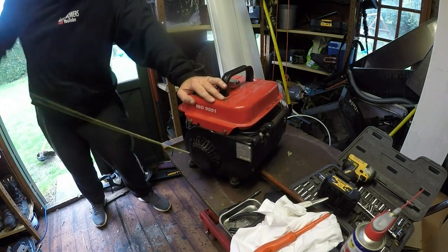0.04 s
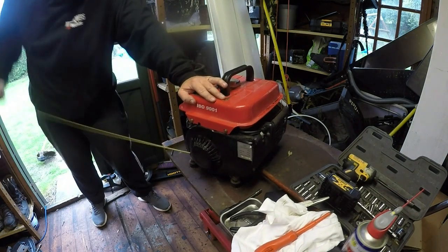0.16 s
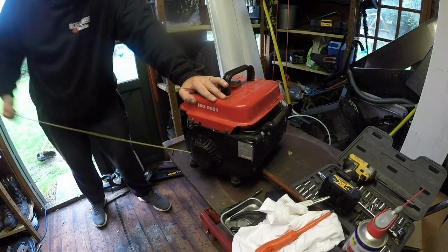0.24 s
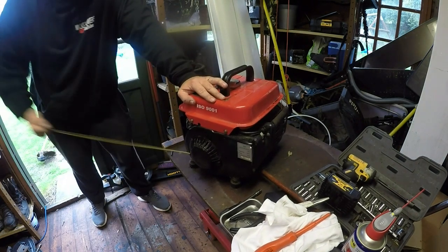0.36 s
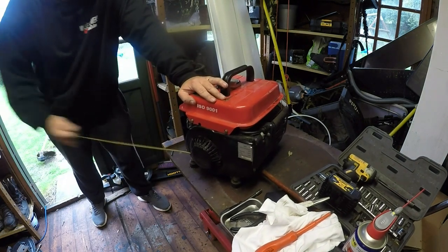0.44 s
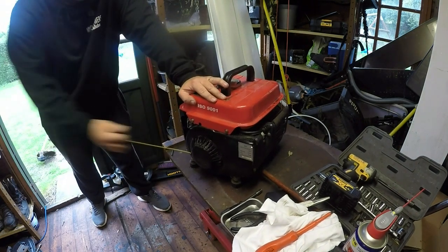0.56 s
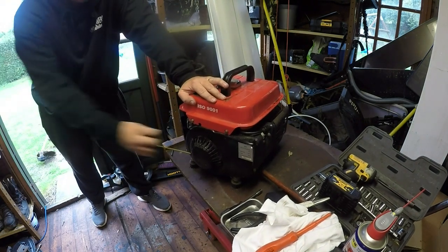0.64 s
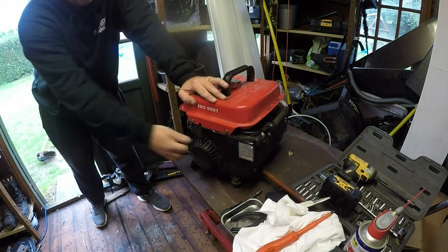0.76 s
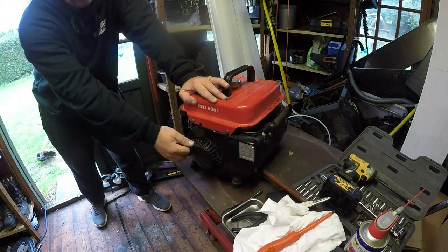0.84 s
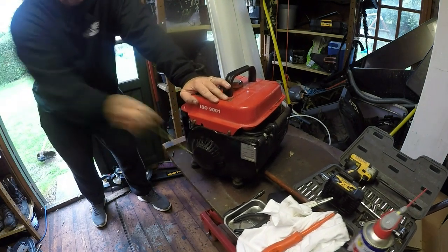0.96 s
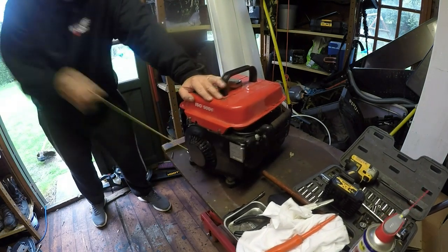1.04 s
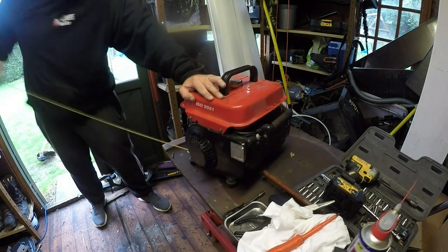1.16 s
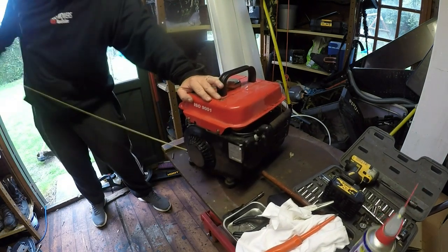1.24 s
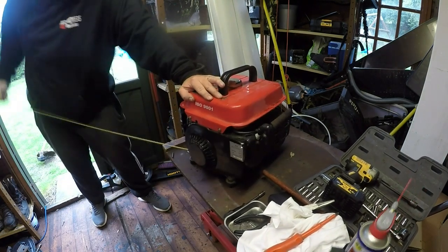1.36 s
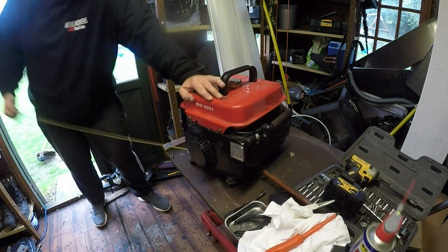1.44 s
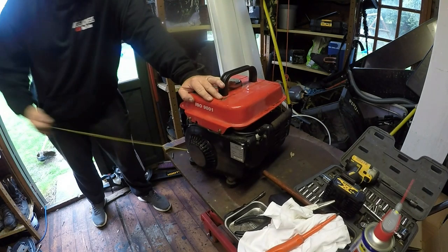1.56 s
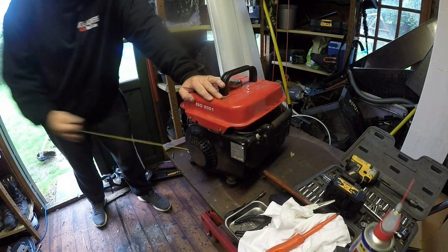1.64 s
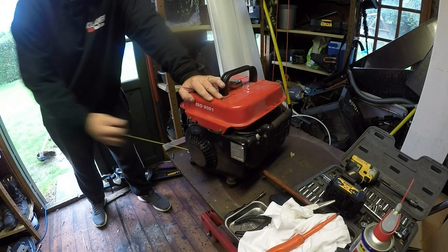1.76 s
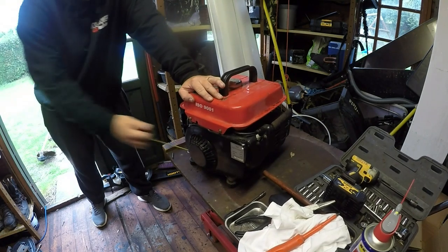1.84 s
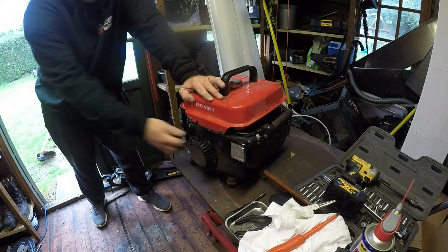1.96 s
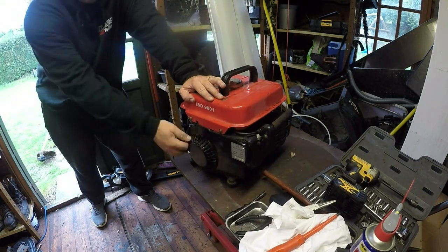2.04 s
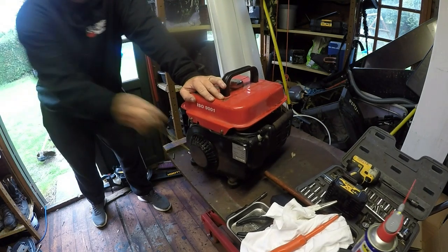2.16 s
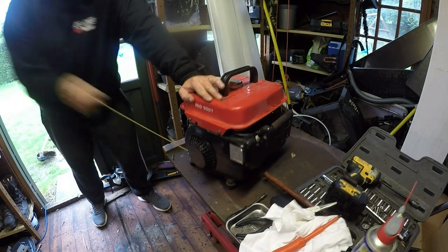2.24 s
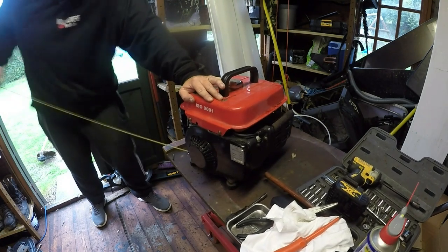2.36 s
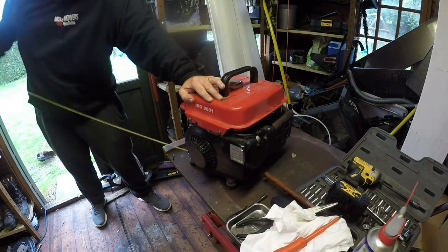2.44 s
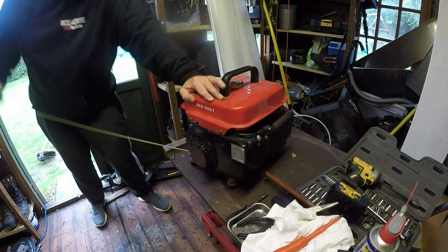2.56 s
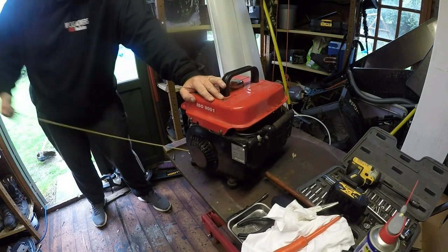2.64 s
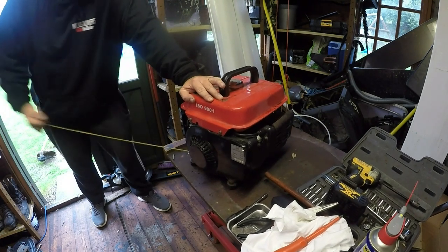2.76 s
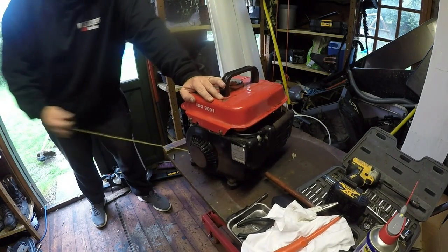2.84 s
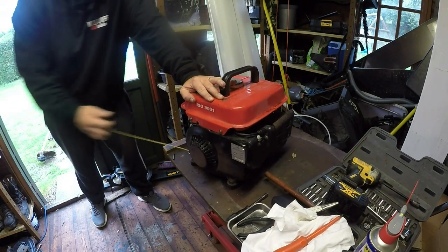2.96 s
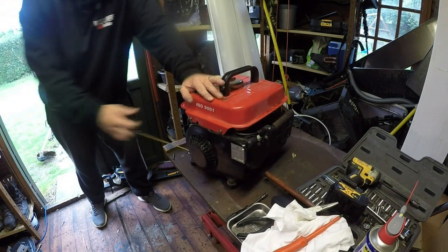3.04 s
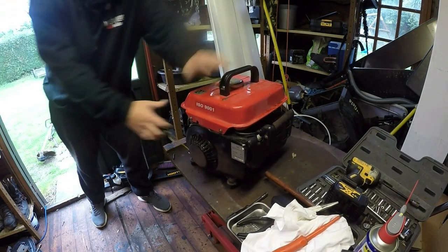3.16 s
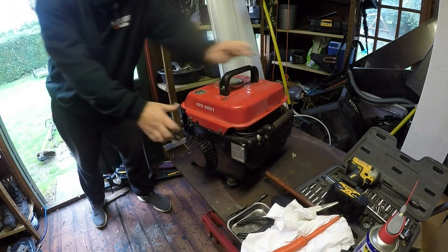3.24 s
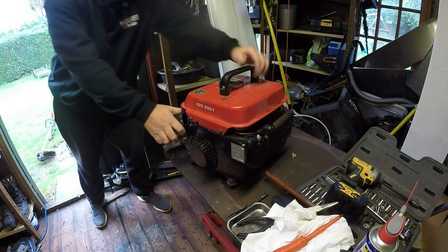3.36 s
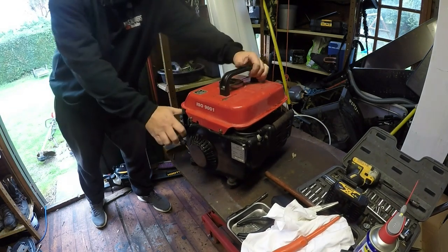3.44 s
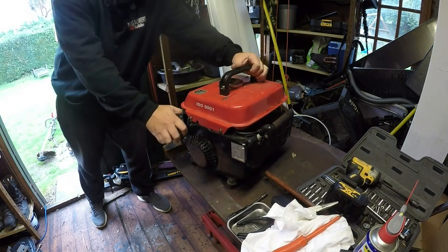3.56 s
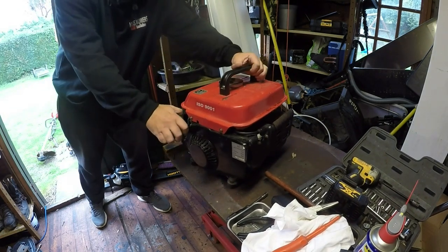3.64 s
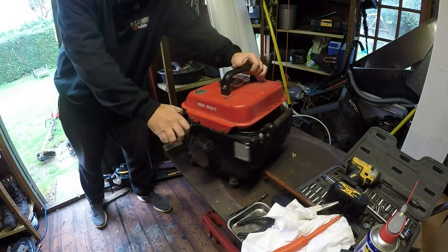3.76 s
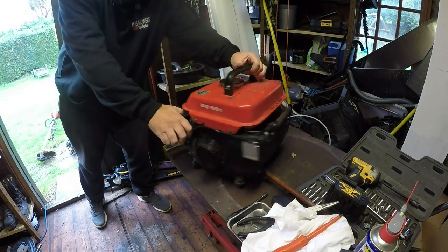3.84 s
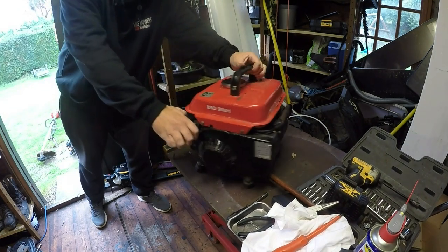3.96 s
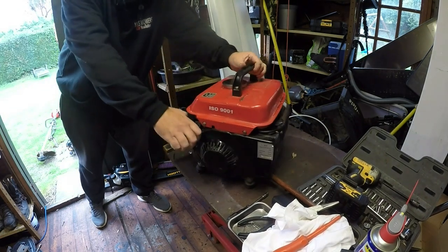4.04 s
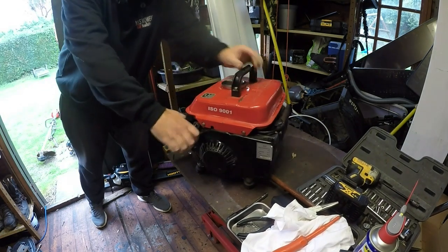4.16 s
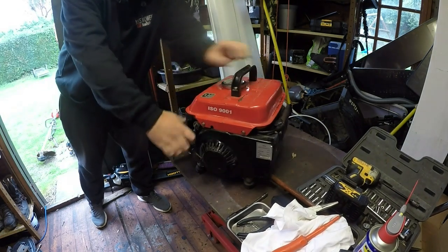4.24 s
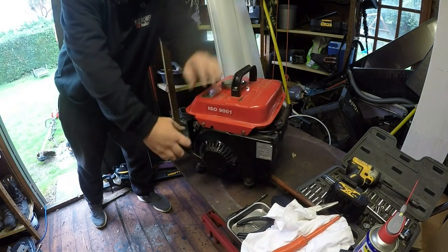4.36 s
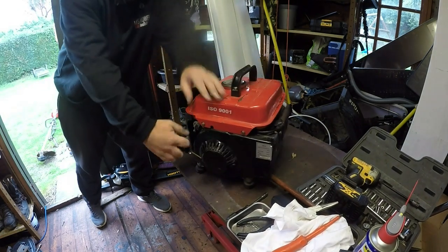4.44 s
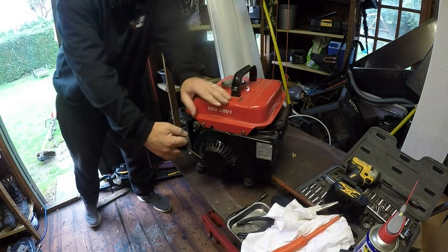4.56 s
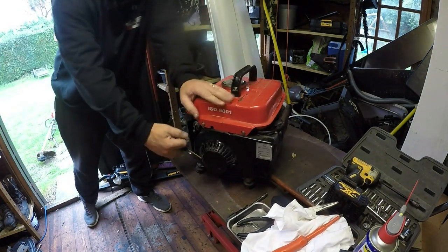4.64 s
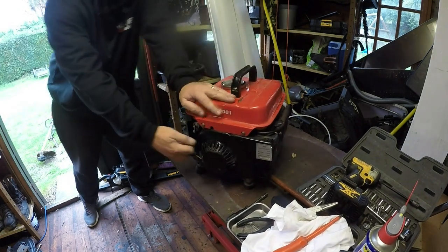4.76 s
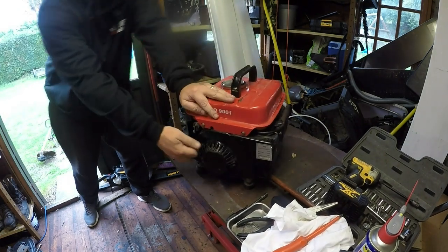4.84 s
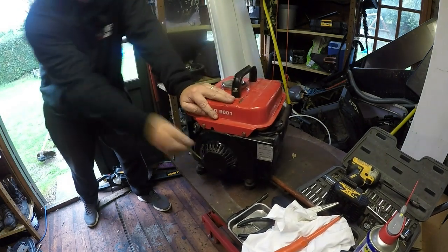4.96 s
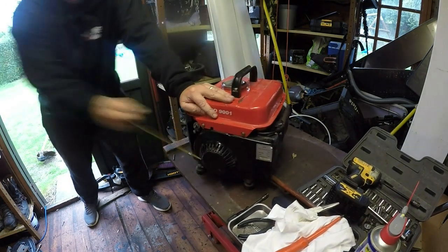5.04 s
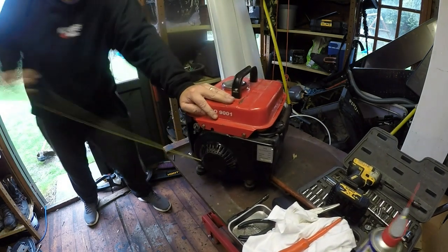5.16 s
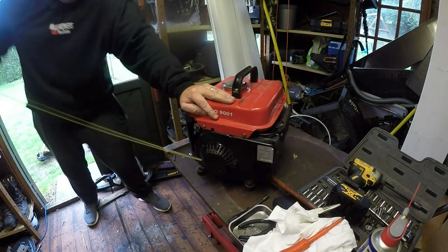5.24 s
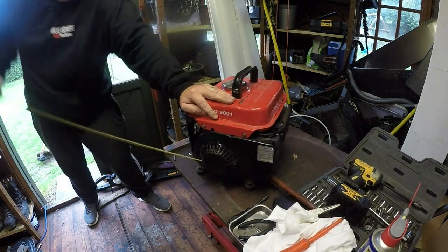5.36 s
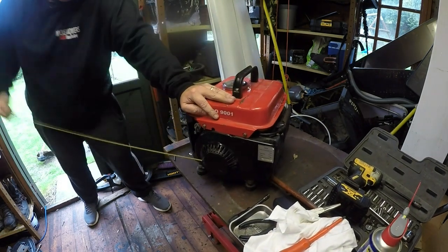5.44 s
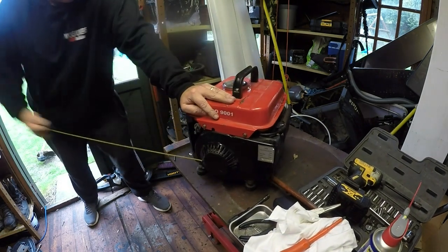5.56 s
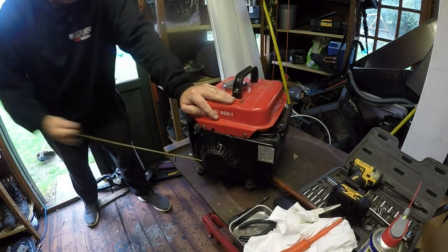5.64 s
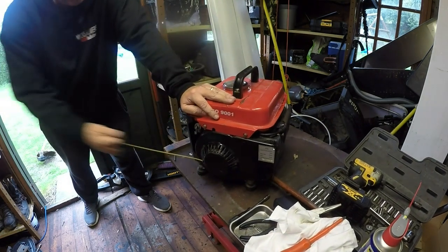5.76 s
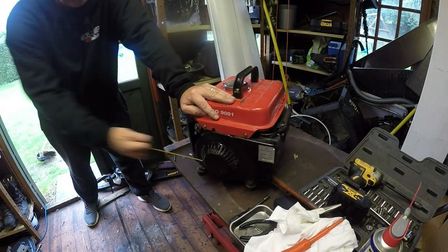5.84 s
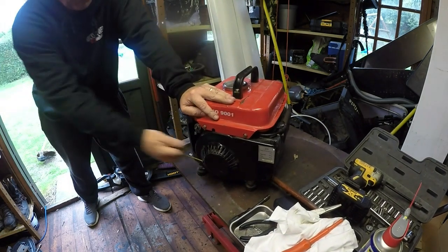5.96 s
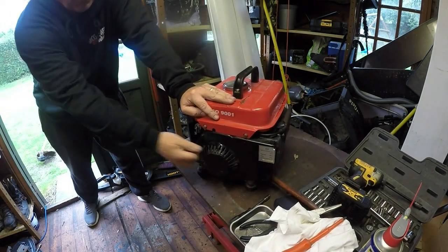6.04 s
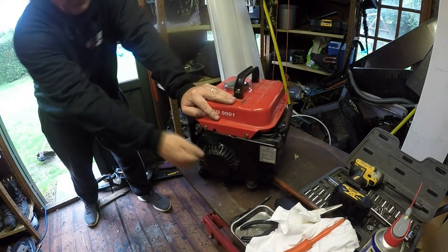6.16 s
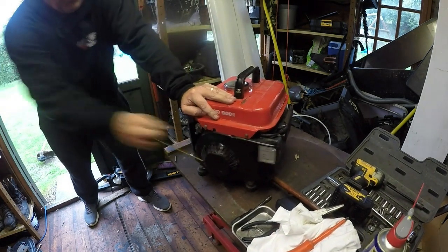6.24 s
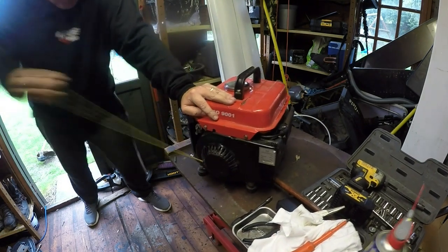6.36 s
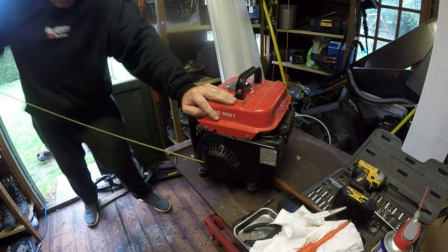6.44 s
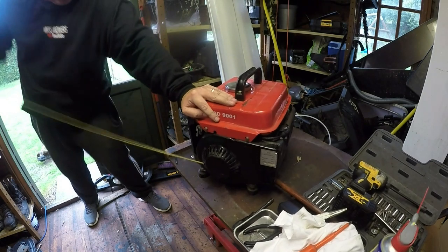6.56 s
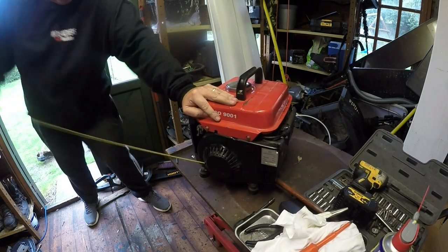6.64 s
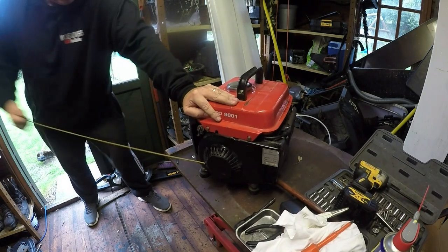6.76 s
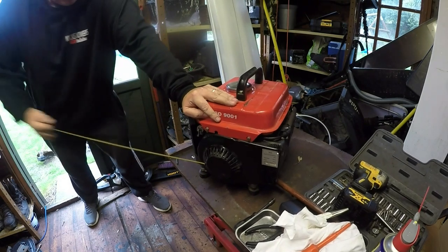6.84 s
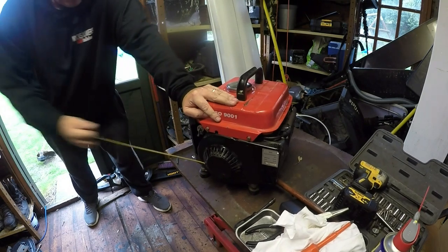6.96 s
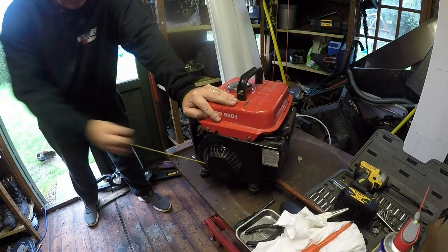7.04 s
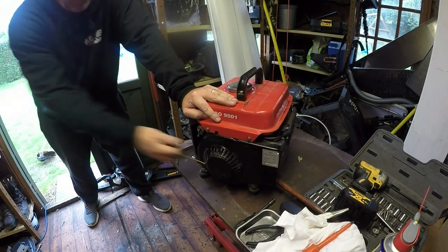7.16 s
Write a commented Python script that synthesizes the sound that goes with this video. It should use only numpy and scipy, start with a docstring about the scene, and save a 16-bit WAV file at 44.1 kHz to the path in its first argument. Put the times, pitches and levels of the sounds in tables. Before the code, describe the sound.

A small petrol engine is yanked over by its recoil rope five times, whining, whirring and clacking, then puffing slower to a stop without firing.

```python
"""A small two-stroke generator on a wooden bench is pulled over by its rope and coasts down without firing.
Each crank turn puffs through the muffler box; the rope whines through its guide; rubbing parts whirr and scrape.
Dogs bang in, loose metal clacks and the handle knocks home: noise bursts through decaying modes.
Once, between pulls, the machine is dragged round on the bench. Steady shed air and a short echo surround it."""
import sys
import numpy as np
from scipy import signal
from scipy.fft import rfft, irfft
from scipy.io import wavfile
from scipy.ndimage import uniform_filter1d

SR = 44100
rng = np.random.default_rng(int(sys.argv[2]) if len(sys.argv) > 2 else 0)


def unload_wav(signal):
    """Save mono or channel-first audio to the path in sys.argv[1] as 16-bit WAV at rate SR, clipped to [-1, 1]."""
    wavfile.write(
        sys.argv[1],
        SR,
        np.round(np.clip(np.atleast_2d(signal).T, -1, 1) * 32767).astype(np.int16),
    )


N = 317520  # samples

# Levels are relative unless a source's own mix gain is unity.
# Handle landing on the cover or dogs biting: (time [s], level [dB], cover thud [dB re level],
# steel ring [dB re level], contact decay [s], frame thump [dB re level])
KNOCKS = [(0.7693, -17, 6, -44, 0.015, -35), (0.9379, -15, -23, -25, 0.018, -8),
          (0.9475, -3.5, -7.5, -19.5, 0.0096, -18), (0.9566, -22.5, 15, -6, 0.0068, 13),
          (1.9908, -18.5, 6.5, -48, 0.02, -33), (2.1402, -10.5, 3, -19, 0.0098, 1.5),
          (2.1483, -20, -5, -17, 0.009, 4), (4.9879, -2.5, -13.5, -18, 0.0044, -5),
          (4.9936, -10, -5, -7, 0.003, -17), (5.0023, -8.5, -7, -16.5, 0.009, -16),
          (6.0606, -13, 1, -28, 0.014, -34), (6.201, 1.5, -1.5, -21, 0.0033, -31),
          (6.2058, -16, -1, -6.5, 0.0098, 7)]
# Bright clacks of loose metal: (time [s], level [dB], steel ring [dB re level], part pitch [Hz])
CLACKS = [(.0376, -11, -42, 3440), (.0524, -12, -19, 2400), (.2129, -8, -20.5, 3480),
          (.2482, -13, -15, 2085), (.3505, -19.5, -9, 2860), (.4409, -15, -17, 2250),
          (.9158, -20, -23, 2040), (1.1501, -11, -41, 1930), (1.2121, -6, -37, 2890),
          (1.2252, -5.5, -16, 2655), (1.4057, -6, -20, 3160), (1.4436, -11, -20, 2490),
          (1.5196, -19, -12, 2057), (1.5828, -8.5, -22, 2530), (2.0976, -46, -29, 2590),
          (2.1238, -22.5, -17, 2320), (2.4144, -6, -34, 2550), (2.4278, -11.5, -12, 2614),
          (2.615, -11, -14, 3150), (2.6852, -4.5, -18, 2850), (2.7504, -10, -18.5, 3450),
          (3.4005, -29, -29, 2790), (3.5796, -44.5, -31, 3450), (4.1157, -31.5, -38, 3000),
          (4.4118, -41.5, -38, 2600), (4.9666, -20.5, -20, 2680), (5.25, -3, -21, 2870),
          (5.2602, -4, -32, 3600), (5.4528, -8, -16.5, 3490), (5.5, -2, -22.5, 2330),
          (5.5745, -7.5, -21, 3734), (6.039, -30.5, -35, 1980), (6.1789, -18.5, -23, 3420),
          (6.2805, -14, -20, 2592), (6.4703, -5, -39, 2750), (6.4826, -6, -13, 2880),
          (6.6843, -17.5, -20, 3310), (6.7315, -10, -20, 2250), (6.7647, -18.5, -20, 3584),
          (6.8034, -14, -14.5, 2040), (6.8274, -17.5, -13, 3675), (6.9023, -9, -17, 3650),
          (7.0758, -17.5, -21, 2810)]
# Dull chuffs as the stalled crank rocks: (time [s], level [dB])
ROCKING_CHUFFS = [(0.863, -30.5), (3.174, -42), (3.257, -30), (3.314, -32.5), (3.459, -28.5), (3.568, -39),
                  (4.077, -47), (4.636, -48), (6.149, -25)]
# Rope whine per pull: (start [s], step up [s], thin out [s], end [s], first strand rate [Hz],
# rate after step [Hz], late rate [Hz], level [dB], overtones [dB])
WHINES = [(1.028, 1.049, 1.154, 1.206, 1430, 1660, 1720, -16.5, 0),
          (2.236, 2.247, 2.38, 2.41, 1438, 1650, 1740, -16, -1),
          (5.08, 5.086, 5.215, 5.25, 1499, 1710, 1740, -16.5, -3.5),
          (6.283, 6.306, 6.455, 6.478, 1410, 1710, 1930, -16.5, -0.5)]
# Rewinding starter clips the cup: (time [s], level [dB])
CUP_TAPS = [(.213, -40), (1.406, -32), (2.685, -35), (5.453, -25), (6.902, -20)]
# Machine turned on the bench: (time [s], feet judder [dB], sleeve rustle [dB])
DRAG = [(3.7, -78, -78), (3.804, -45.5, -57.5), (3.98, -47, -59), (4.056, -62, -56.5), (4.098, -55, -52.5),
        (4.154, -76, -53.5), (4.32, -91, -85)]
# Pulls: (dogs bite [s], dogs let go [s], last puff [s], crank speed at last puff [turns/s],
# slowing [turns/s per s], effort [dB], cup ring [dB], mid rewind [s], rewind rattle [dB])
PULLS = [ (-.22, .051, .671, 4.8, 30.8, 2, -33, 0.34, -33),
         (.946, 1.226, 1.903, 5.0, 27.8, 2.5, -18, 1.506, -32),
         (2.139, 2.428, 3.114, 5.45, 25.1, 2, -28, 2.72, -32),
         (4.987, 5.26, 6.014, 3.4, 34.3, 2, -27, 5.5, -34.5),
         (6.199, 6.485, 7.208, 8.47, 25.3, 1.5, -42, 6.37, -30.5)]
# Shape of every pull: (share of bite-to-release time, whirr [dB], scrape [dB], bench rumble [dB])
HAUL = [(0.0, -50, -45, -47), (.15, -31.5, -29, -25.5), (.4, -29, -24, -29), (.6, -33.5, -24, -30),
        (.8, -38.5, -21.5, -28.5), (1.0, -42.5, -26.5, -33), (1.15, -50, -44.5, -35)]
# Coasting at full speed: (whirr [dB], scrape [dB], bench [dB], feet [dB])
COAST_DB = [-36, -37, -30, -31]
# Level change with speed: (whirr, scrape, bench, feet) [dB per dB of speed]
COAST_SLOPE = [0.35, 0.67, 0.99, 0.57]
# Only hands on the machine: (whirr [dB], scrape [dB], bench [dB], feet [dB])
REST_DB = [-68, -65, -66, -45]

# Modes of starter cover: (frequency [Hz], level [dB], t60 [s])
COVER_MODES = [(703.7, -5, 0.078), (739.3, -6.5, 0.092), (853, -1.5, 0.029), (1002, -9, 0.032),
               (1190, -3, 0.041), (1415, -3.5, 0.026)]
# Modes of loose metal parts: (frequency [Hz], level [dB], t60 [s])
METAL_MODES = [(1540, -4, .06), (1739, -10, .1), (2083, -12, .1), (2250, -12, .12), (2449, -10, .12),
               (2584, -8, .2), (2767, -10, .1), (3278, -6, .07), (3634, -6, .07), (4100, -9, .08),
               (4850, -12, .08), (6050, -14, .07)]
# Modes of steel on steel: (frequency [Hz], level [dB], t60 [s])
STEEL_MODES = [(7693, -8, .08), (9080, -4, .1), (9250, -2, .18), (9420, -3, .1), (9650, -4, .07),
               (9900, -6, .07), (10090, -6, .08), (13300, -9, .07), (13620, -9, .13), (13900, -10, .08),
               (14300, -11, .07)]
# Modes of starter cup: (frequency [Hz], level [dB], t60 [s])
CUP_MODES = [(2906, -4, .5), (2935, -6, .3), (5430, -8, .4), (9170, -7, .4), (9290, -8, .25),
             (13650, -17, .2)]
# Modes of tube frame: (frequency [Hz], level [dB], t60 [s])
FRAME_MODES = [(333, 0.5, 0.17), (436, 2.5, 0.11), (488, 2.5, 0.071), (626, -12.5, 0.016)]
# Modes of wooden bench: (frequency [Hz], level [dB], t60 [s])
BENCH_MODES = [(153.4, -2, 0.13), (219.3, -8, 0.099), (321, 0, 0.062), (367, -13, 0.12)]
# Modes of machine on its feet: (frequency [Hz], level [dB], t60 [s])
FEET_MODES = [(27.5, -2, 0.57), (42.2, 1, 0.27), (71, -9, 0.12)]
# Modes of muffler box: (frequency [Hz], level [dB], t60 [s])
MUFFLER_MODES = [(38.8, -10.5, 0.086), (70.5, -12, 0.11), (152, -5.5, 0.082), (235, -12.5, 0.027)]

# Crack of a clack: (frequency [Hz], density [dB per Hz])
CRACK = [(760, -22), (1300, -1), (1800, -13.5), (2410, -2.5), (2670, -5), (3350, -1.5), (4410, -7),
         (9000, -22), (11700, -66), (19800, -120)]
# Crack of a heavy knock: (frequency [Hz], density [dB per Hz])
CLUNK = [(150, -28), (250, 1), (720, -2.5), (1060, -7), (2190, -2), (3320, -3.5), (4610, -7.5), (7900, -23),
         (13100, -73), (15800, -41)]
# Top edge of blows: (frequency [Hz], density [dB per Hz])
SPIT = [(4500, -30), (7000, -3), (9500, 0), (11500, -12), (14000, -16), (15800, -28)]
# Rubbing scrape: (frequency [Hz], density [dB per Hz])
SCRAPE = [(820, -36), (1400, -8), (2320, -5), (2910, -1.5), (3220, -8), (5510, -13), (8600, -18.5),
          (9330, -27.5), (15800, -40.5)]
# Air in the shed: (frequency [Hz], density [dB per Hz])
SHED = [(53, -25.5), (90, -21.5), (161, 17), (209, -11), (329, 9.5), (578, -4), (702, -1), (4320, -11.5),
        (14500, -25.5), (15800, -48)]
# Whirr, sleeve cloth, chuff breath: (frequency [Hz], density [dB per Hz])
WHIRR = [(350, -1), (500, 7.5), (1400, 8.5), (2000, -9.5), (3000, -19.0)]
CLOTH = [(1500, -3), (2500, -13), (4300, -7.5), (5500, -15), (9000, -25), (12000, -60)]
BREATH = [(450, -33.5), (700, 11.5), (1000, 17.5), (1400, 13), (2200, -52.5)]

SHED_DB, SHED_T60_S, SHED_WET_DB = -55.5, 0.27, -10
TOP_HZ = 15500
BITE_TURNS_PER_S, FULL_TURNS_PER_S = 10.9, 25.1
RUN_UP_POWER = 2.25  # most speed is gained late in the pull
SETTLE_DB_PER_S = 38  # once the crank stalls
REWIND_S, REWIND_SCRAPE_DB = 0.12, -0.5  # scrape re whirr
PUFF_DB, HAULED_PUFF_DB, PUFF_SCATTER_DB = -16, -10, 0.5
CHUFF_LEAD_S, CHUFF_DECAY_S = 0.019, 0.015  # lead: ahead of each puff
CHUFF_DB, CHUFF_SLOPE, CHUFF_EDGE_DB = -30.5, -0.53, -12  # slope: dB per dB of speed, clearer when slow
TICK_TURN = 0.53  # part of a turn before each puff
TICK_DB, TICK_SLOPE, TICK_STEEL_DB, TICK_HZ = -30, -0.71, -22, 3634  # slope: dB per dB of speed
CLACK_THUD_DB, CLACK_DECAY_S = -7, 0.008
SLACK_DB, SLACK_RISE_S = -29, 0.021
WHINE_STEP_S, WHINE_FIRST_DB, WHINE_THIN_DB = 0.012, -2.5, -9.5
THROB_DB, THROB_TURN = 2.5, 0.18  # slow crank is loudest this far past a puff, quiet against compression


def undb(db):
    """Amplitude gain of a level in dB."""
    return 10 ** (np.asarray(db) / 20)


def unit(x):
    """Scale to RMS 1."""
    return x / np.sqrt(np.mean(x ** 2))


def colour(x, table):
    """Shape by (frequency [Hz], density [dB]) points; white noise keeps its power."""
    hz, db = np.transpose(table)
    bins_hz = np.fft.rfftfreq(N, 1 / SR)
    gain = undb(np.interp(np.log(bins_hz + 1), np.log(hz), db, left=-90))
    return irfft(rfft(x) * unit(gain), N)


def response(modes):
    """Spectrum of summed decaying cosines, low-passed at 6.6 times the last mode."""
    cycles = np.fft.rfftfreq(N)  # per sample
    back = np.exp(-2j * np.pi * cycles)
    twice = back ** 2
    out = 0
    for hz, db, t60_s in modes:
        r = np.exp(-np.log(1000) / t60_s / SR)
        c = np.cos(2 * np.pi * hz / SR)
        out = out + undb(db) / (1 - 2 * r * c * back + r * r * twice)
    low_pass = (1 + 1j * cycles * SR / (6.6 * modes[-1][0])) ** 2
    return out * (1 - twice) / 2 / low_pass


def ring(x, modes):
    """Excite modes at their own gain."""
    return irfft(rfft(x) * response(modes), N)


def body(x, modes):
    """Excite modes scaled so that white noise keeps its power."""
    gain = response(modes)
    return irfft(rfft(x) * gain / np.sqrt(np.mean(np.abs(gain) ** 2)), N)


def noise():
    """White noise, RMS near 1."""
    return rng.standard_normal(N)


def walk(rate_hz):
    """Random levels, one per 1 / rate_hz, joined by slews; RMS 1."""
    k = int(SR / rate_hz)
    steps = np.repeat(rng.standard_normal(N // k + 1), k)
    return unit(uniform_filter1d(steps, k)[:N])


def grit(spread_db):
    """Dense contacts of uneven size, RMS 1."""
    return unit(noise() * undb(spread_db * walk(600)))


def bursts(s, db, decay_s, snap_db=-40):
    """Envelope of sudden contacts: exponential decay plus a snap within the first millisecond."""
    out = np.zeros(N)
    for start, size, tau in zip(s, undb(db), np.clip(decay_s, .001, .1)):
        i = int(start * SR)
        t = np.arange(min(N - i, int(8 * tau * SR))) / SR
        out[i:i + len(t)] += size * (np.exp(-t / tau) + undb(snap_db) * np.exp(-t / 0.00032))
    return out


def pushes(s, db, width_s):
    """Short smooth force pulses."""
    kicks = np.zeros(N)
    kicks[(s * SR).astype(int)] = undb(db)
    return np.convolve(kicks, np.hanning(int(width_s * SR)))[:N]


def crank(pull, t):
    """Speed [turns/s]: runs up under the rope, then falls steadily."""
    bite, free, last, end, slowing = pull[:5]
    share = np.clip((t - bite) / (free - bite), 0, 1) ** RUN_UP_POWER
    coast = np.minimum(end + slowing * (last - np.maximum(t, free)), FULL_TURNS_PER_S)
    return np.maximum(BITE_TURNS_PER_S + (coast - BITE_TURNS_PER_S) * share, .1)


def turns(before=0.):
    """(time [s], speed [dB re full], still hauled) where the crank is `before` turns ahead of a puff."""
    rows = []
    for pull in PULLS:
        # integrate speed backwards from the last puff
        t = np.arange(max(pull[0], 0) + .03, pull[2], 1e-4)[::-1]
        left = np.cumsum(crank(pull, t)) * 1e-4
        times = np.interp(np.arange(before, left[-1]), left, t)[::-1]
        for s in times[times < N / SR]:
            rows.append((s, 20 * np.log10(crank(pull, s) / FULL_TURNS_PER_S), s < pull[1]))
    return np.transpose(rows)


def motion():
    """Whirr, scrape, bench and feet [dB]: rest, coast, haul and rewind add as power."""
    t = np.arange(N) / SR
    power = undb(REST_DB)[:, None] ** 2 * np.ones(N)
    share, *haul = np.transpose(HAUL)
    puffs = turns()[0]
    turn = np.interp(t, puffs, np.arange(len(puffs)))
    throb = THROB_DB * np.cos(2 * np.pi * (turn - THROB_TURN))
    for pull in PULLS:
        bite, free, last, _, _, effort_db, _, rewind, rewind_db = pull
        progress = (t - bite) / (free - bite)
        speed_db = 20 * np.log10(crank(pull, np.minimum(t, last)) / FULL_TURNS_PER_S)
        settle_db = SETTLE_DB_PER_S * np.maximum(t - last, 0)
        coast_db = np.outer(COAST_SLOPE, speed_db) + np.c_[COAST_DB] - settle_db
        coast_db[:3] += throb * np.clip(-speed_db / 28.0, 0, 1) * (t < last)  # feet do not throb
        power += np.clip(progress, 0, 1) ** 2 * undb(2 * coast_db)
        for k, db in enumerate(haul):
            power[k] += undb(2 * np.interp(progress, share, db + effort_db, left=-99, right=-99))
        bump = undb(2 * rewind_db) * np.exp(-((t - rewind) / REWIND_S) ** 2)
        power[:2] += bump * undb([[0], [2 * REWIND_SCRAPE_DB]])
    return 10 * np.log10(power)


def shed_air():
    """Steady coloured noise."""
    return undb(SHED_DB) * colour(noise(), SHED)


def shed_echo(machine):
    """Decaying noise tail; timber walls swallow the treble."""
    t = np.arange(int(.4 * SR)) / SR
    tail = rng.standard_normal(len(t)) * np.exp(-np.log(1000) * t / SHED_T60_S) * (t > .004)
    tail = signal.lfilter([1], [1, -.4], tail)
    echo = signal.fftconvolve(machine, tail / np.sqrt(np.sum(tail ** 2)))[:N]
    return undb(SHED_WET_DB) * echo


def drag():
    """Juddering rubber feet push the bench softly; a sleeve rustles."""
    s, *columns = np.transpose(DRAG)
    t = np.arange(N) / SR
    judder, rustle = (np.interp(t, s, undb(db), left=0, right=0) for db in columns)
    push = uniform_filter1d(judder * grit(3.9), size=60)
    return undb(12.0) * body(push, BENCH_MODES) + rustle * colour(grit(1.5), CLOTH)


def slack():
    """Rasp swelling up to each bite as the slack rope runs out."""
    t = np.arange(N) / SR
    swell = sum(np.exp(np.minimum(t - p[0], 0) / SLACK_RISE_S) * (t < p[0]) for p in PULLS)
    return colour(undb(SLACK_DB) * swell * grit(2.5), SCRAPE)


def cup():
    """Noise bursts ring the cup when the dogs let go and when the rewinding starter clips it."""
    s, db = np.hstack([np.transpose(PULLS)[[1, 6]], np.transpose(CUP_TAPS)])
    return body(bursts(s, db, np.full(len(s), .015)) * noise(), CUP_MODES)


def frame():
    """Heavy knocks give the tube frame a short push."""
    s, db, *_, frame_db = np.transpose(KNOCKS)
    return undb(-34) * ring(pushes(s, db + frame_db, 0.0014), FRAME_MODES)


def blows(table, crack, ring_db, crack_db, thud_db, steel_db, spit_db):
    """Contacts crack, ring metal parts and thud in the cover; steel on steel adds a top edge."""
    s, db, low_db, top_db, decay_s = np.transpose(table)[:5]
    high = bursts(s, db, decay_s, 0.68) * grit(0.51)
    low = bursts(s, db + low_db, decay_s, 1.45) * noise()
    top = bursts(s, db + top_db, 1.8 * decay_s) * noise()
    bright = undb(ring_db) * body(high, METAL_MODES) + undb(crack_db) * colour(high, crack)
    steel = undb(steel_db) * body(top, STEEL_MODES) + undb(steel_db - 2.0) * body(top, CUP_MODES)
    spit = undb(spit_db) * colour(top, SPIT)
    return bright + steel + spit + undb(thud_db) * body(low, COVER_MODES)


def clack_rows():
    """Loose clacks and coasting-crank ticks, as rows for blows() and pings()."""
    ticks = [(s, TICK_DB + TICK_SLOPE * speed_db, TICK_STEEL_DB, TICK_HZ)
             for s, speed_db, hauled in turns(TICK_TURN).T if not hauled]
    return [(s, db, CLACK_THUD_DB, steel_db, CLACK_DECAY_S, hz)
            for s, db, steel_db, hz in sorted(list(CLACKS) + ticks)]


def pings(table):
    """Each loose part sounds a short, rough sine."""
    s, db, _, _, decay_s, hz = np.transpose(table)
    latest = np.clip(np.searchsorted(s, np.arange(N) / SR) - 1, 0, None)
    tone = np.sin(2 * np.pi * np.cumsum(hz[latest]) / SR)
    return undb(-8) * bursts(s, db, 1.08 * decay_s) * walk(500) * tone


def turning():
    """Rubbing parts shake cover, metal, bench and feet, never evenly."""
    whirr_db, scrape_db, bench_db, feet_db = motion()
    shake_db = 2.5 * walk(30)
    roll = grit(2.9) * undb(whirr_db + shake_db)
    whirr = undb(-5.5) * body(roll, COVER_MODES) + undb(-1.5) * colour(roll, WHIRR)
    rub = grit(1.0) * undb(scrape_db + shake_db)
    scrape = undb(-17.5) * body(rub, METAL_MODES) + undb(-32.5) * body(rub, STEEL_MODES)
    scrape = scrape + undb(-1.0) * colour(rub, SCRAPE)
    bench = body(undb(bench_db + 3.57 * walk(25)) * noise(), BENCH_MODES)
    feet = undb(feet_db) * unit(ring(noise(), FEET_MODES))
    return whirr + scrape + bench + feet


def rope():
    """Strands strike the guide in turn: a wavering, patchy pitch whose overtones smear into noise."""
    t = np.arange(N) / SR
    pitch_hz, edge_db, gain = np.zeros(N), np.zeros(N), np.zeros(N)
    for start, step, thin, end, first_hz, hz, late_hz, db, over_db in WHINES:
        now = t > start - .1  # each later pull takes over
        pitch_hz[now] = np.interp(t[now], [step, step + WHINE_STEP_S, thin], [first_hz, hz, late_hz])
        edge_db[now] = over_db
        level_db = db + WHINE_FIRST_DB * (t < step) + WHINE_THIN_DB * (t > thin)
        gain += undb(level_db) * (t > start) * (t < end)
    waver = 1 + .025 * walk(300) + .012 * walk(40)
    phase = 2 * np.pi * np.cumsum(pitch_hz * waver) / SR
    out = 0
    for k, overtone_db in enumerate([-2, -7, -9, -13]):
        smear = (.62 + .45 * k) * walk(450)
        patchy_db = overtone_db + edge_db * (k > 0) + 4.5 * walk(200)
        out = out + undb(patchy_db) * np.sin((k + 1) * phase + smear)
    out = uniform_filter1d(gain, size=700) * out
    return out + undb(-18.5) * body(out, METAL_MODES)


def chuffs():
    """Soft noise blows inside the cover, with little metal, before puffs and as the crank rocks."""
    s, speed_db, _ = turns()
    before_puffs = [np.maximum(s - CHUFF_LEAD_S, 0), CHUFF_DB + CHUFF_SLOPE * speed_db]
    s, db = np.hstack([np.transpose(ROCKING_CHUFFS), before_puffs])
    decay_s = np.full(len(s), CHUFF_DECAY_S)
    soft = bursts(s, db, decay_s) * noise()
    edge = colour(bursts(s, db + CHUFF_EDGE_DB, decay_s) * noise(), SCRAPE)
    return undb(-10.0) * body(soft, COVER_MODES) + undb(-3) * colour(soft, BREATH) + undb(-7.5) * edge


def muffler():
    """A short push of air each turn rings the muffler box; a hiss follows it out."""
    s, _, hauled = turns()
    db = np.where(hauled, HAULED_PUFF_DB, PUFF_DB) + PUFF_SCATTER_DB * rng.standard_normal(len(s))
    push = pushes(s, db, 0.0032)
    boom = undb(-37.5) * ring(push, MUFFLER_MODES)
    hiss = undb(-17.5) * body(bursts(s, db, np.full(len(s), .015)) * noise(), COVER_MODES)
    shake = undb(-59.5) * ring(push, FEET_MODES)  # piston rocks the machine on its feet
    return boom + shake + hiss


def scene():
    """Machine, its echo and the shed air, one channel."""
    loose = clack_rows()
    knocks = blows(KNOCKS, CLUNK, ring_db=-20.0, crack_db=-4.5, thud_db=-2.5, steel_db=-40.5, spit_db=-3.0)
    clacks = blows(loose, CRACK, ring_db=-25.0, crack_db=-7.5, thud_db=-5, steel_db=-13.0, spit_db=-7.0)
    hits = knocks + frame() + cup() + clacks + pings(loose)
    machine = drag() + slack() + hits + turning() + rope() + chuffs() + muffler()
    return (machine + shed_echo(machine) + shed_air())[None]


def record(dry):
    """Round the loudest peaks by tanh, then low-pass steeply at TOP_HZ."""
    rounded = np.tanh(0.86 * dry) / 0.97
    return signal.sosfilt(signal.ellip(10, .2, 80, TOP_HZ, fs=SR, output="sos"), rounded)


dry = scene()
out = record(dry)
unload_wav(out)
```